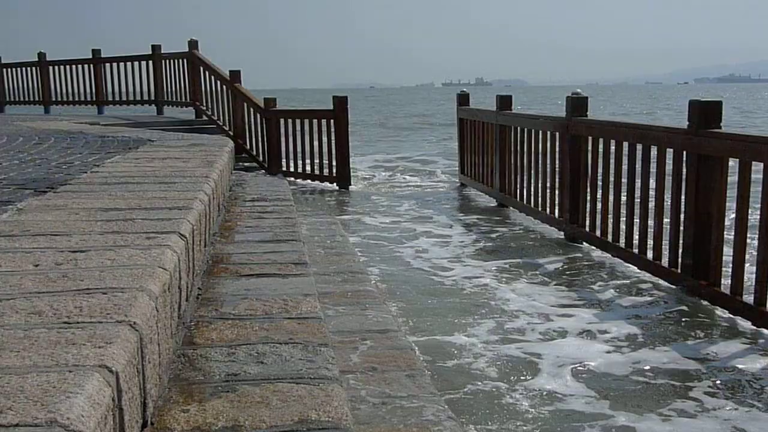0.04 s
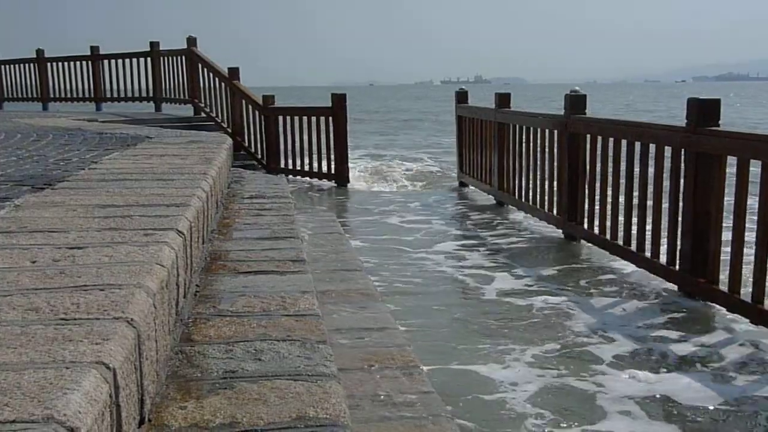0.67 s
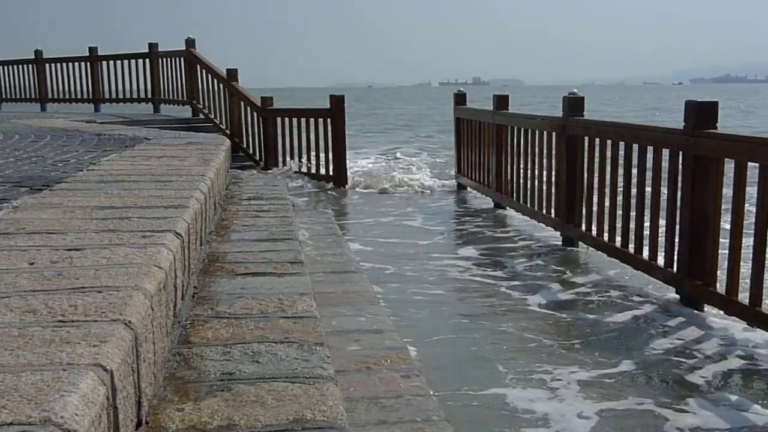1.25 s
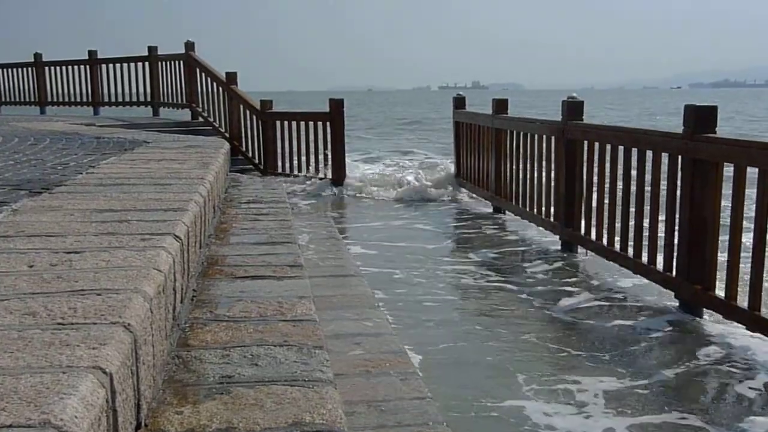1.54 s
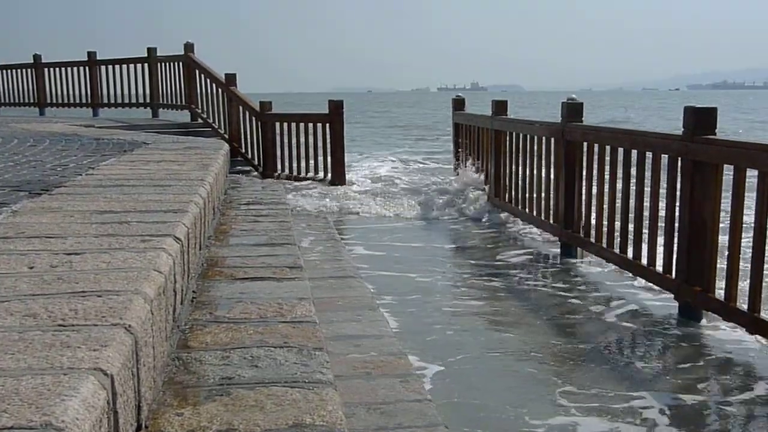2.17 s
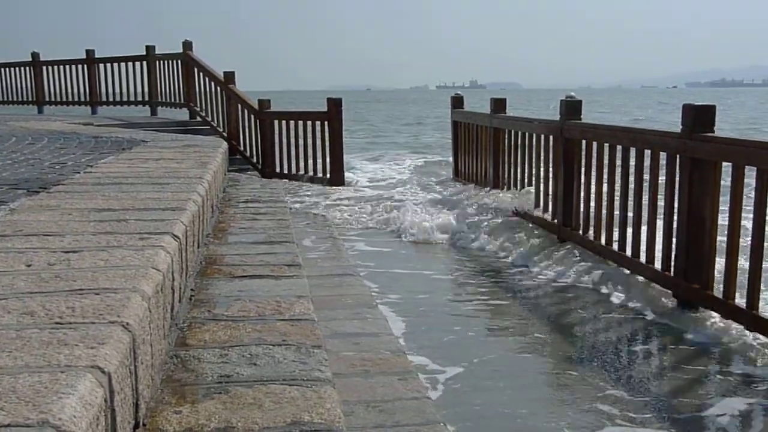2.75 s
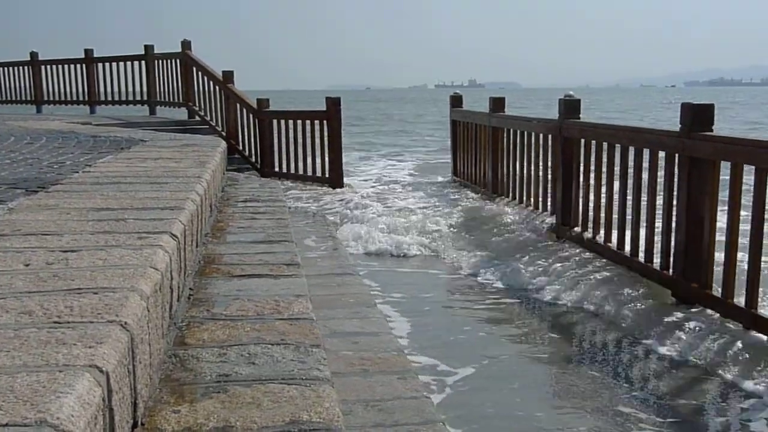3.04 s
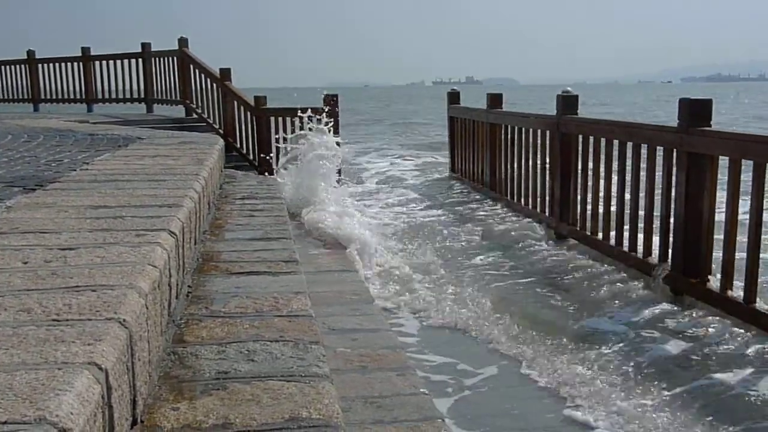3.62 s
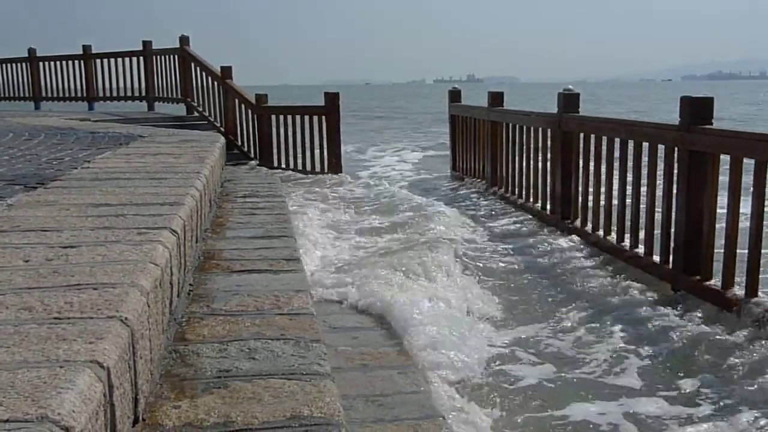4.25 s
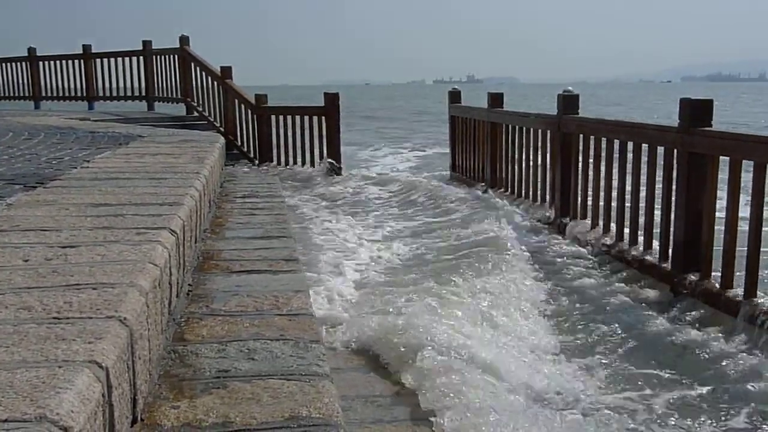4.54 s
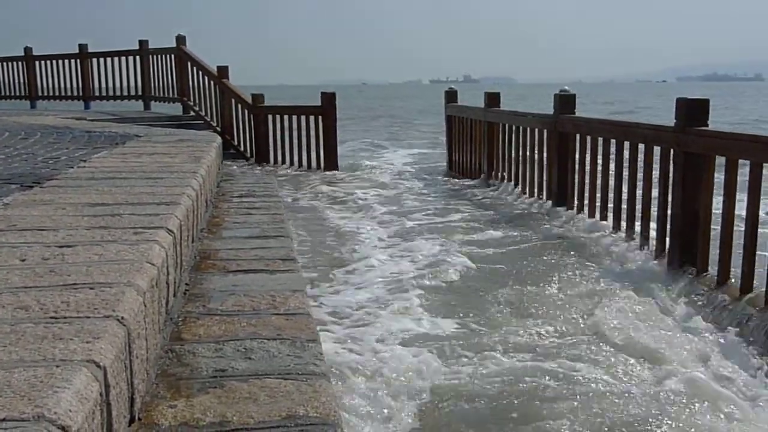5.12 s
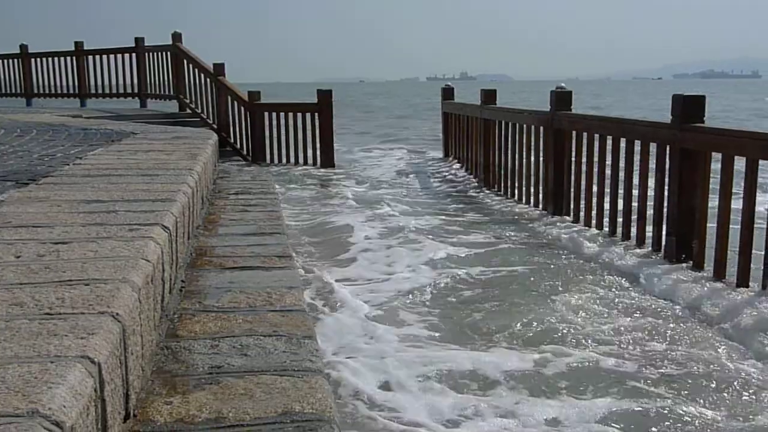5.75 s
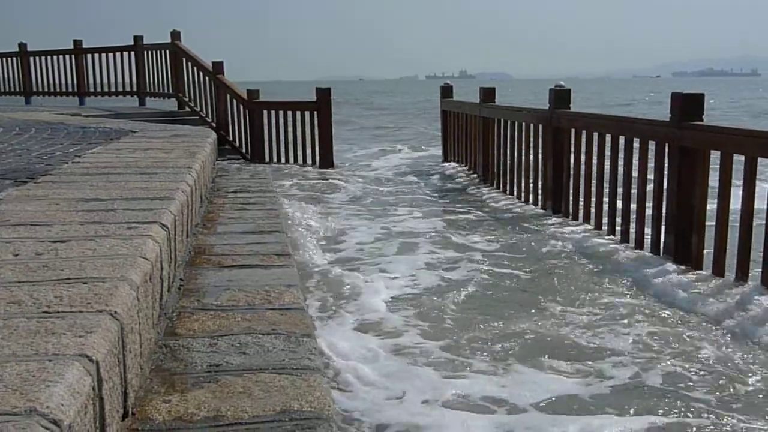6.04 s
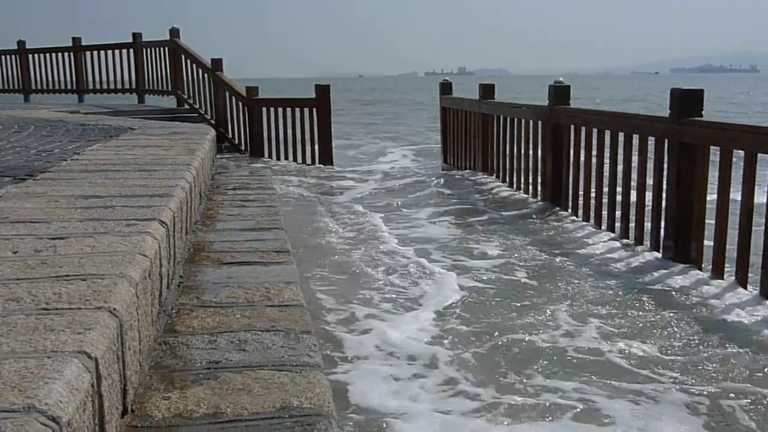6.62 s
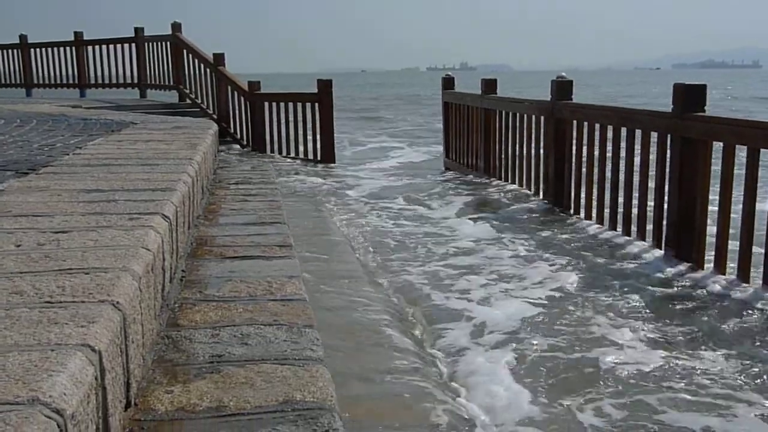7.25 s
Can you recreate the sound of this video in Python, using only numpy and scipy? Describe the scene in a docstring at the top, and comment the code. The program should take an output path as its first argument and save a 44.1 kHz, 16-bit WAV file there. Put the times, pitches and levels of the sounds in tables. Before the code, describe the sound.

Close, muffled-sounding surf washes and bubbles across stone beside a seaside railing. One loud tick of spray overloads the microphone, and the water ducks for a moment. The wash then swells as a wave breaks on the steps with a soft gust of wind, a distant engine humming faintly underneath. The backwash brings small slaps, hollow gulps and thinning fizz, with three softer spray ticks near the end.

```python
"""After half a second of silence a small, dull-sounding recorder starts: water churns, wind rumbles and
an engine drones far out at sea. A drop of spray ticks on the case and overloads it; the gain ducks and
creeps back. A wave surges through a railing and washes over a flooded stone walkway, its bubbles
gurgling and fizzing, while a gust passes. As it drains, water slaps on the stone, air pockets gulp
and three more drops strike the case."""
import sys
import numpy as np
from scipy import signal
from scipy.fft import rfft, irfft, next_fast_len
from scipy.io import wavfile

SR = 44100
rng = np.random.default_rng(int(sys.argv[2]) if len(sys.argv) > 2 else 0)


def unload_wav(signal):
    """Save mono or channel-first audio to the path in sys.argv[1] as 16-bit WAV at rate SR, clipped to [-1, 1]."""
    wavfile.write(
        sys.argv[1],
        SR,
        np.round(np.clip(np.atleast_2d(signal).T, -1, 1) * 32767).astype(np.int16),
    )


N = 321489

# Lull, surge and backwash. Each row: time in seconds, moving water fader in dB, foam fader in dB.
WAVE_FADERS = [(0.6, -31.5, -31.5), (0.88, -29.5, -30.5), (1.7, -31, -33.5), (2.2, -28, -31.5),
               (2.7, -29, -32), (3.45, -28.5, -30.5), (4.05, -27.5, -28), (4.48, -28, -27.5),
               (4.95, -29.5, -29), (5.3, -27, -28), (5.75, -27.5, -29), (6.15, -27.5, -28.5),
               (6.55, -31, -32), (6.73, -29, -28.5), (7.29, -31, -29.5)]
# The deep heave, strongest as the wave rolls past close by. Each row: time in seconds, level in dB.
HEAVE_FADER = [(0.8, -40), (1.5, -44.5), (2.1, -41.5), (3.7, -41.5), (4.15, -49.5), (4.7, -43.5),
               (5.2, -37.5), (5.8, -37.5), (6.4, -45), (7.0, -41)]
# Crests breaking against the steps. Each row: centre in seconds, lift of the wash in dB.
CRESTS = [(3.19, 3), (3.7, 3.4), (6.13, 0)]
# The water's tone before it is split into bands. Each row: frequency in Hz, gain in dB.
WATER_EQ = [(40, -23), (100, -8.5), (150, -3.5), (230, 1.5), (560, 2.5), (1000, -2.5), (1500, -7),
            (2050, -6.5), (2600, -11), (3400, -12.5), (4400, -16), (6000, -12.5)]
DRAIN_S, FIZZ_LOSS_DB_PER_S = 4.96, 2   # once the water turns back, the finest bubbles burst first


def surf(churn_db=-4.5, wash_db=-2.5, foam_trim_db=-0.48, fizz_db=-4.5, gurgle_db=-11):
    """The water heaves; big bubbles churn and gurgle, middling ones wash, the smallest fizz in foam."""
    flow_db, foam_db = automation(WAVE_FADERS)
    heave_db, = automation(HEAVE_FADER)
    breaking_db = sum(db * swell(s, width_s=0.075) for s, db in CRESTS)
    near = bubble_cloud(low_hz=201.5, high_hz=4463, cycles=16.2, spread_db=2.0, rise=0.089, count=7000)
    spray = bubble_cloud(low_hz=915, high_hz=4600, cycles=3.3, spread_db=3.5, rise=0.11, count=3000)
    far = rush(patchy_db=0.86, flicker_hz=10)
    water = equalise(far + from_db(-7.5) * near + from_db(-15) * spray, WATER_EQ)
    water *= from_db(0.62 * drift(13))   # the whole sheet of water sloshes
    heave = from_db(heave_db) * band(water, 80, 157)
    churn = from_db(flow_db + churn_db + 0.4 * breaking_db) * band(water, 186, 409)
    wash = from_db(flow_db + wash_db + breaking_db) * band(water, 528, 1020)
    foam = from_db(foam_db + foam_trim_db + 0.28 * breaking_db) * band(water, 1144, 3000)
    spent_db = FIZZ_LOSS_DB_PER_S * np.maximum(np.arange(N) / SR - DRAIN_S, 0)
    fizz = from_db(foam_db + fizz_db + 0.38 * breaking_db - spent_db) * band(water, 3390, 7000)
    big_bubbles = bubble_cloud(low_hz=228, high_hz=715, cycles=26, spread_db=2.0, rise=0.21, count=180)
    gurgle = from_db(flow_db + gurgle_db) * big_bubbles
    return heave + churn + wash + foam + fizz + gurgle


def bubble_cloud(low_hz, high_hz, cycles, spread_db, rise, count):
    """Bubbles ring at random moments, mostly faint, rising in pitch as they near the surface; rms 1."""
    out = np.zeros(N)
    for when, size, chance, damping, sign in rng.random((count, 5)):
        hz = low_hz * (high_hz / low_hz) ** size
        strength = from_db(spread_db * min(-np.log(1 - chance), 4))
        bubble = ring(hz, cycles * (.5 + damping) / hz, rise)
        add(out, when * N / SR, np.sign(sign - .5) * strength * hz * bubble)   # hz evens power per Hz
    return unit_rms(out)


def rush(patchy_db, flicker_hz):
    """Countless far bubbles merge into noise that swells in patches half an octave wide."""
    white = rng.standard_normal((2, N))
    edges_hz = 60 * 2 ** np.arange(0, 7.5, .5)
    out = np.zeros(N)
    for k in range(len(edges_hz) - 1):
        patch = butter(white[k % 2], edges_hz[k:k + 2], "band")
        out += patch * from_db(patchy_db * drift(flicker_hz))
    return unit_rms(out)


# Water hitting stone. Each row: start in seconds, peak in dB before the trim.
SLAP_CUES = [(4.403, -14), (5.318, -14), (6.076, -14), (6.123, -14), (6.169, -20), (6.3, -15),
             (6.397, -15.5), (6.678, -13), (6.876, -14.5), (6.923, -12), (7.015, -15)]


def slaps(crack_t60=0.0035, patter_t60=0.048, patter_db=-6, trim_db=0.5):
    """Water slaps on stone: a dull crack, then a short patter of drops."""
    out = np.zeros(N)
    t = np.arange(SR // 10) / SR
    crack = np.exp(-np.log(1000) * t / crack_t60)
    patter = from_db(patter_db) * np.exp(-np.log(1000) * t / patter_t60)
    for s, db in SLAP_CUES:
        burst = butter(rng.standard_normal(len(t)) * (crack + patter), [600, 2600], "band", order=3)
        add(out, s, from_db(db + trim_db) * burst / np.abs(burst).max())
    return out


# The largest air pockets. Each row: start in seconds, opening pitch in Hz, peak in dB before the trim.
GULP_CUES = [(1.008, 351, -15), (2.435, 451, -19), (2.465, 1010, -16.5), (3.18, 650, -16),
             (3.683, 587, -16.5), (3.743, 646, -14.5), (4.04, 506, -16), (4.092, 322, -16.5),
             (4.526, 432, -17), (4.75, 250, -16), (5.978, 566, -18.5), (6.166, 933, -15),
             (6.391, 2480, -19.5), (6.687, 675, -15), (6.813, 246, -13.5), (6.833, 124, -21.5),
             (6.858, 608, -15), (6.913, 141, -21), (6.987, 226, -17), (7.021, 126, -22), (7.243, 129, -26)]


def gulps(middle_hz=500, middle_t60=0.074, closing_cycles=1.34, trim_db=-3.0):
    """An air pocket takes a cycle or so to close, then rings; the larger, the lower and longer."""
    out = np.zeros(N)
    for s, hz, db in GULP_CUES:
        gulp = ring(hz, middle_t60 * (middle_hz / hz) ** 0.22, rise=0.1)
        cycles = np.arange(len(gulp)) / SR * hz
        gulp *= 1 - np.exp(-(cycles / closing_cycles) ** 2)
        add(out, s, from_db(db + trim_db) * gulp / np.abs(gulp).max())
    return out


# Spray landing on the recorder. Each row: start in seconds, strength of the hit in dB.
DROP_CUES = [(.9089, 19.5), (6.411, -4.5), (6.944, -9), (7.042, -1)]
# The parts of one tick. Each row: frequency in Hz, gain in dB, seconds to fade by 60 dB.
TICK_PARTIALS = [(9000, 4, .0003), (4900, -17, .003), (2000, -6, .0022), (1700, -39, .05), (110, -35, .06),
                 (18, -36, .14)]


def spray_drops():
    """Each drop makes a bright tick, a brief ring and a low thump."""
    out = np.zeros(N)
    for s, hit_db in DROP_CUES:
        for hz, db, t60 in TICK_PARTIALS:
            add(out, s, from_db(hit_db + db) * ring(hz, t60))
    return out


# The wind's bass-heavy tone. Each row: frequency in Hz, gain in dB.
WIND_EQ = [(12, -33), (28, -13.5), (55, 6.5), (90, -1), (250, -18)]


def wind(breeze_db=-55.5, gust_db=8, lumpy_db=2.2):
    """Eddies at the microphone make a lumpy rumble that swells in one gust."""
    level_db = breeze_db + gust_db * swell(3.66, width_s=.22) + lumpy_db * drift(9)
    return from_db(level_db) * equalise(rng.standard_normal(N), WIND_EQ)


# The drone comes and goes. Each row: time in seconds, fader in dB.
ENGINE_FADER = [(0.7, -50), (1.6, -54.5), (2.2, -49.5), (3.7, -48.5), (4.1, -56.5), (5.1, -65),
                (5.9, -52.5), (7.2, -57)]


def far_engine(hz=70.3, wander=.03, fading_db=2.0, trim_db=-2.8):
    """A low engine drone of two partials wavers on its way over the water."""
    fader_db, = automation(ENGINE_FADER)
    phase = 2 * np.pi * np.cumsum(hz * (1 + wander * drift(5))) / SR
    out = np.zeros(N)
    for multiple, db in (1.001, 4.5), (3.15, -7):
        gain = from_db(fader_db + trim_db + db + fading_db * drift(7))
        out += np.sqrt(2) * gain * np.sin(multiple * phase)
    return out


def gain_control(x, threshold_db=-7, fast_db_per_s=160, slow_db_per_s=16, slow_share=.44, lag_s=.0083):
    """An overload pulls the gain down; part returns quickly, the rest creeps back."""
    t = np.arange(N) / SR
    cut_db = 0.97 * np.maximum(20 * np.log10(np.abs(x) + 1e-9) - threshold_db, 0)
    fast = np.maximum.accumulate(cut_db + fast_db_per_s * t) - fast_db_per_s * t
    slow = np.maximum.accumulate(slow_share * cut_db + slow_db_per_s * t) - slow_db_per_s * t
    pole = np.exp(-1 / (lag_s * SR))
    return from_db(-signal.lfilter([1 - pole], [1, -pole], np.maximum(fast, slow)))


def ring(hz, t60, rise=0):
    """A sine that fades by 60 dB in t60 seconds while its pitch climbs by the fraction `rise`."""
    age = np.arange(int(t60 * SR)) / (t60 * SR)
    return np.sin(2 * np.pi * hz * t60 * age * (1 + rise * age / 2)) * np.exp(-np.log(1000) * age)


def automation(rows):
    """Straight ramps between timed rows, one curve for each fader."""
    times, *faders = np.transpose(rows)
    return [np.interp(np.arange(N) / SR, times, fader) for fader in faders]


def swell(s, width_s):
    """A smooth rise and fall of height 1 around a moment."""
    return np.exp(-((np.arange(N) / SR - s) / width_s) ** 2)


def drift(hz, hop=40):
    """A slow random wobble with a spread of 1."""
    pole = np.exp(-2 * np.pi * hz * hop / SR)
    white = rng.standard_normal(N // hop + 2002)
    slow = signal.lfilter([1], [1, -2 * pole, pole * pole], white)[2000:]   # once it has settled
    return np.interp(np.arange(N) / hop, np.arange(len(slow)), unit_rms(slow))


def equalise(x, curve):
    """Shape a sound with a smooth EQ curve; rms 1."""
    hz, db = np.transpose(curve)
    size = next_fast_len(N + SR // 10)
    bins_hz = np.maximum(np.fft.rfftfreq(size, 1 / SR), 1)
    gain = from_db(np.interp(np.log(bins_hz), np.log(hz), db))
    return unit_rms(irfft(rfft(x, size) * gain, size)[:N])


def band(x, low_hz, high_hz):
    """A steep-sided slice of a sound; rms 1."""
    return unit_rms(butter(butter(x, low_hz, "high", order=5), high_hz, "low", order=5))


def butter(x, hz, kind, order=2):
    """Butterworth filter."""
    return signal.sosfilt(signal.butter(order, hz, kind, fs=SR, output="sos"), x)


def add(track, s, sound):
    """Mix a sound into a track at s seconds."""
    at = int(s * SR)
    track[at:at + len(sound)] += sound[:max(N - at, 0)]


def from_db(db):
    """Decibels to gain."""
    return 10 ** (np.asarray(db) / 20)


def unit_rms(x):
    """Scale to rms 1."""
    return x / np.sqrt(np.mean(x ** 2) + 1e-20)


def scene():
    """All that reaches the microphone, in mono."""
    return (surf() + slaps() + gulps() + wind() + far_engine() + spray_drops())[None]


def record(dry, ceiling=.52, hiss_db=-63, start_s=.572):
    """The small recorder clips, ducks, dulls the treble and hisses faintly; silent until it starts."""
    clipped = np.clip(dry[0], -.65 * ceiling, ceiling)   # it overloads sooner on one side
    ducked = clipped * gain_control(dry[0])
    dull = butter(ducked, 3440, "low", order=7)
    hiss = from_db(hiss_db) * rng.standard_normal(N)
    running = np.arange(N) / SR >= start_s
    return butter((dull + hiss) * running, 8000, "low", order=24)[None]


dry = scene()
out = record(dry)
unload_wav(out)
```